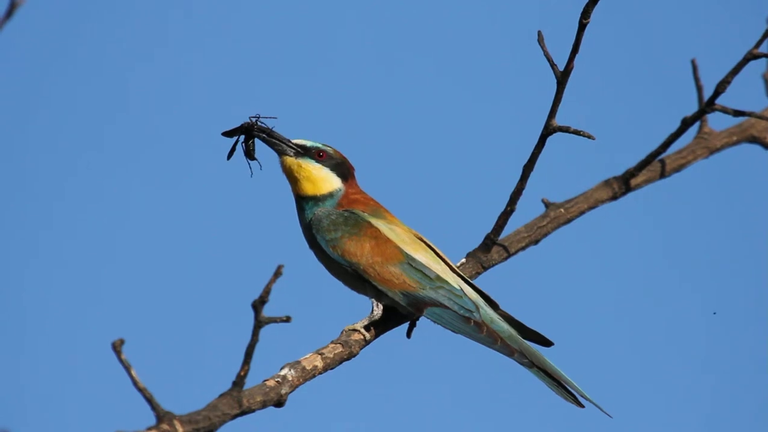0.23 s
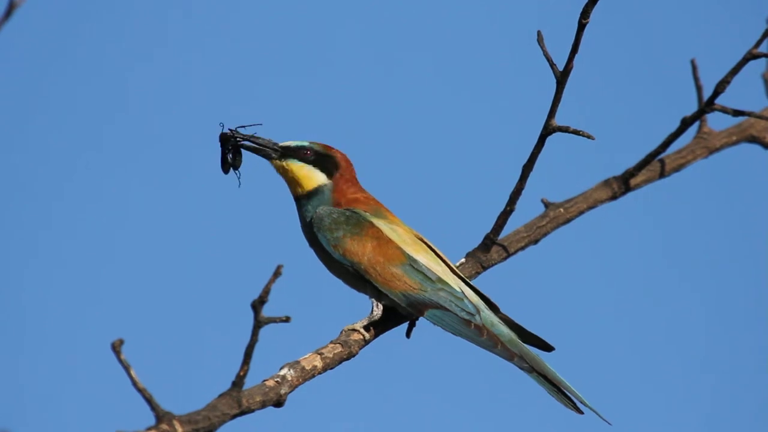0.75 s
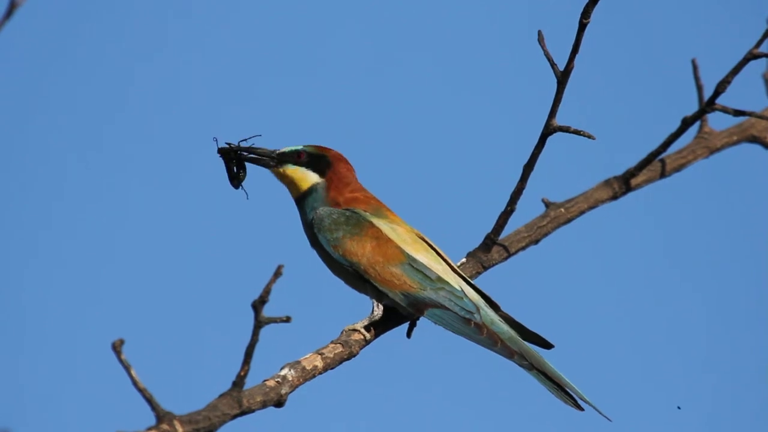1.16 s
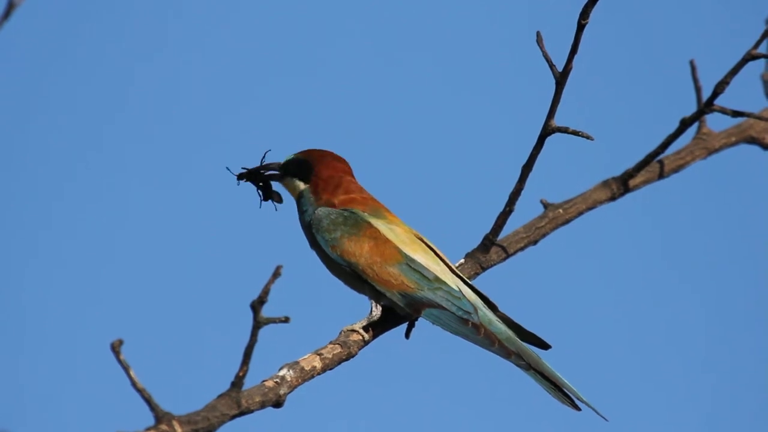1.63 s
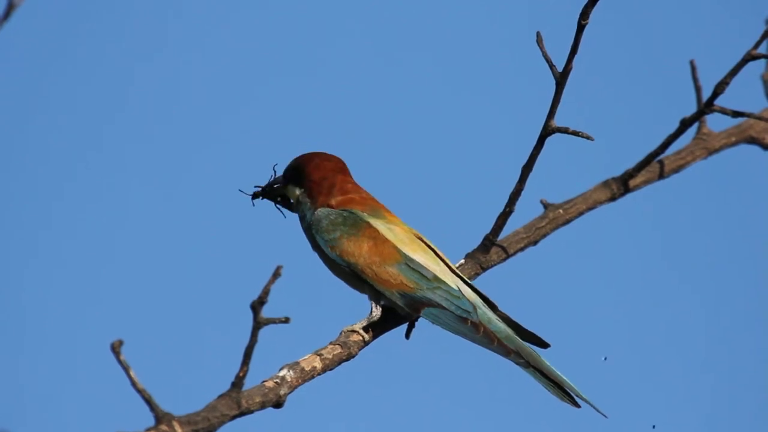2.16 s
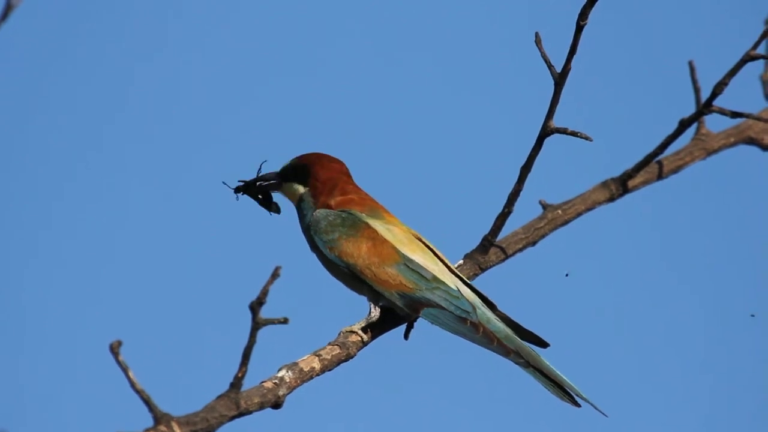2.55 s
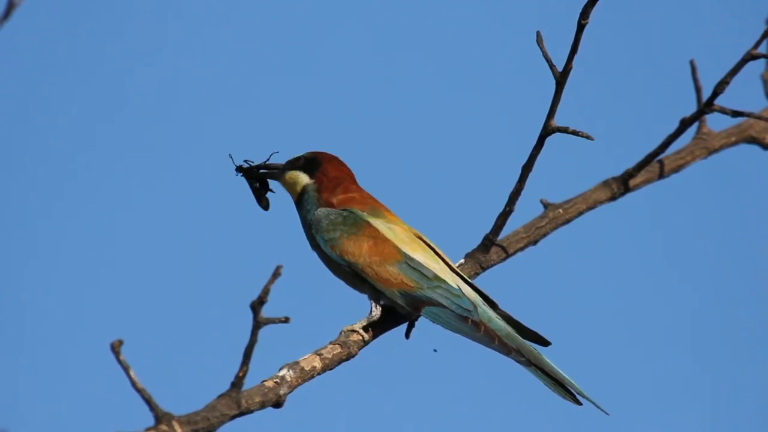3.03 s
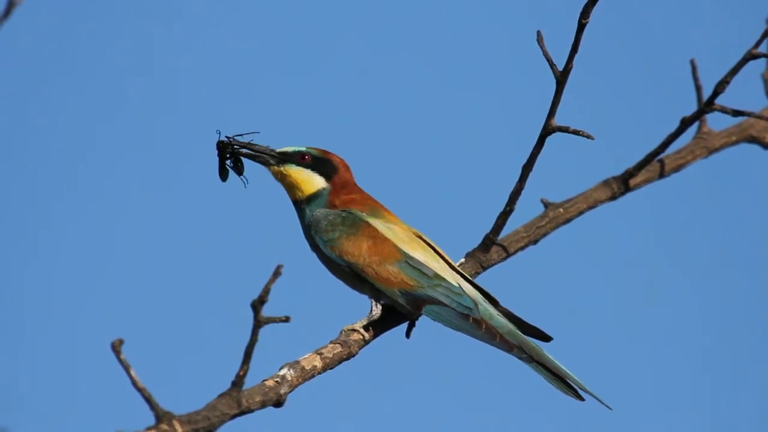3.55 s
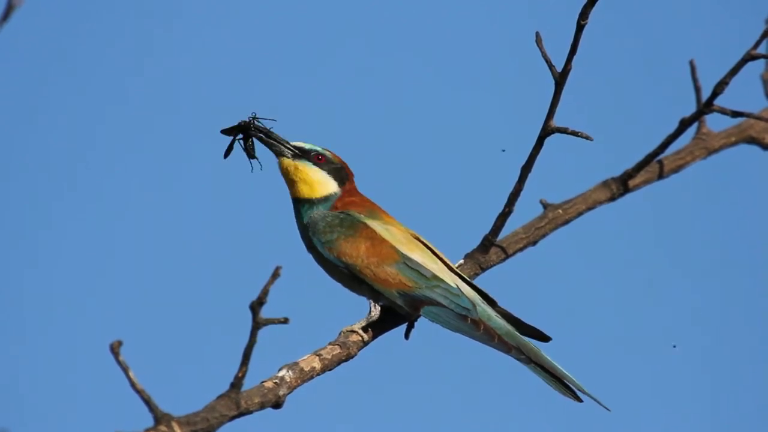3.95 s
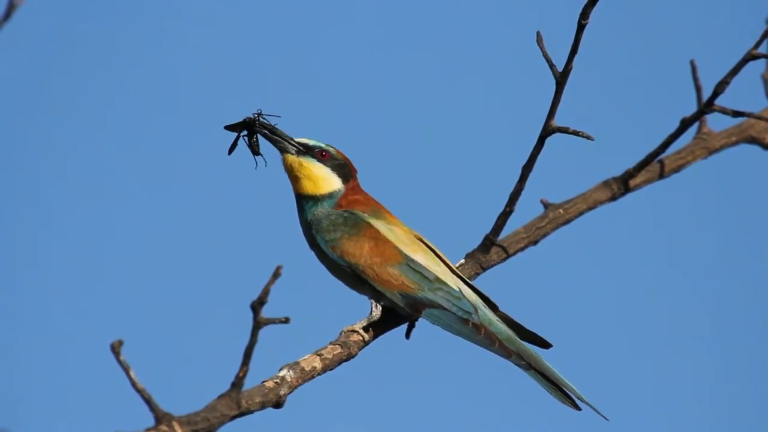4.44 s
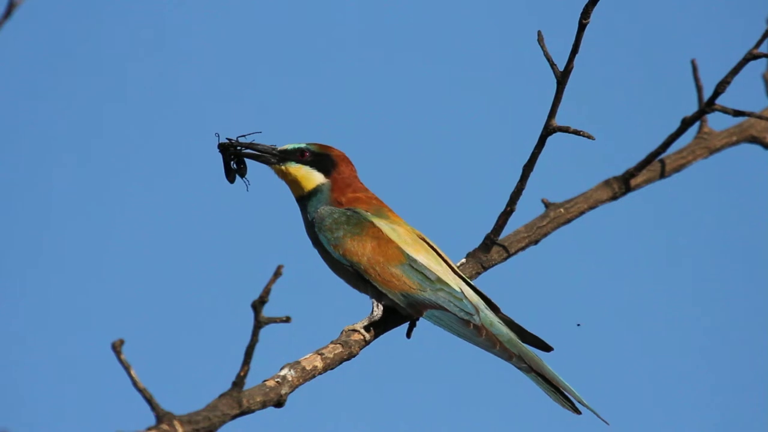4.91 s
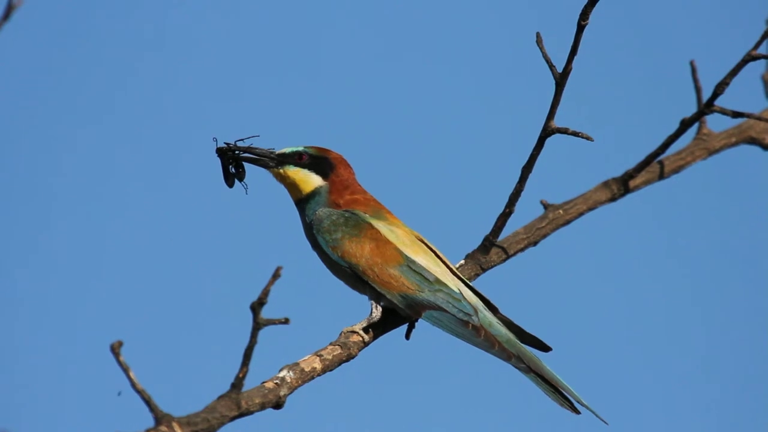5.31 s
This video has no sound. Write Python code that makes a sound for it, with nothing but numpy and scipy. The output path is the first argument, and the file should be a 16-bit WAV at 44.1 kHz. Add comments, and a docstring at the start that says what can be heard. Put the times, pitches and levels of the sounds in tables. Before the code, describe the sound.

A calm open landscape, about 5.6 seconds. A loud, burry bee-eater whistle is already under way at the start. Very high, thin songbird notes slip by at 0.1-0.5 s, the first rising, the second mostly falling, over faint low hums in the first second or so. Softer chips follow around 0.3, 0.6 and 0.9 s, then strong rolling whistles near 1.1, 1.2, 1.8 and 2.1 s, and a pair overlapping around 2.6 s. Each lasts roughly a tenth of a second or less, sweeping near 2 kHz. Calls then thin out: chips at 3.0 and 3.4, a higher, sharper one at 3.5, a roll at 4.65, another sharp chip at 5.2, and a last loud call at 5.5 s. Throughout, a faint flock whistles irregularly, and distant toads give soft, sagging hoots from 0.6 s onward. Insects shimmer quietly over hush; low breeze swells softly at the start, 1.25 and 3.1 s. Trees return diffuse tails.

```python
"""Open country on a calm day, bee-eaters calling around a perch, the loud ones near and the faint ones farther off.
Each call is a short, nearly pure whistle that arches or rolls in pitch; the single calls each have a ground echo
that beats against them and makes them burr. Branches and far trees scatter the calls as filtered noise tails.
Farther off, more of the flock whistle at random and toads hoot in sagging tones, with two faint low hums.
A small songbird gives two thin, high notes; insects chirr in throbbing noise bands, over a soft rush of air."""
import sys
import numpy as np
from scipy import signal
from scipy.fft import rfft, irfft
from scipy.io import wavfile
from scipy.ndimage import map_coordinates

SR = 44100
rng = np.random.default_rng(int(sys.argv[2]) if len(sys.argv) > 2 else 0)


def dump(signal):
    """Clip the signal to [-1, 1] and save it as 16-bit WAV at the path in sys.argv[1]."""
    limited = np.clip(np.atleast_2d(signal).T, -1, 1)
    pcm = np.round(limited * 32767).astype(np.int16)
    wavfile.write(sys.argv[1], SR, pcm)


N = 246078
TIME = np.arange(N) / SR   # seconds

# Individual long calls, loud ones near and faint ones farther off; one arch of pitch, up to three even flicks:
# crest_s, rise_ms, fall_ms, start_hz, crest_hz, end_hz, flick_spacing_ms, flick_before_crest_hz,
# flick_on_crest_hz, flick_after_crest_hz, swell_db, octave_db, level_db, ground_echo_delay_ms, ground_echo_db
LONG_CALLS = [(-0.0082, 45.0, 33.0, 1600.0, 2042.0, 1166.0, 24.0, 2, 3, 0, 24.0, -35, -16.5, 5.1, -16),
              (0.1935, 107.0, 60.0, 1953.0, 2009.0, 1710.0, 25.0, -2, 616.0, 174.0, 5.0, -42, -45.6, 6.08, -4),
              (0.5246, 105.0, 48.0, 2011.0, 1952.0, 1733.0, 45.0, 465.0, 1030.0, 0, 2.0, -42, -43.5, 6.47, -4.8),
              (1.0797, 50.0, 48.0, 1661.0, 2031.0, 1487.0, 26.0, 283.0, 575.0, 184.0, 15.0, -42, -22.1, 9.74, -17),
              (1.2295, 42.0, 23.0, 1537.0, 1971.0, 1400.0, 24.0, -1, 4, 0, 23.0, -42, -16.2, 1.86, -2.2),
              (1.4964, 56.0, 43.0, 1800.0, 2191.0, 1657.0, 19.0, 285.0, 412.0, 377.0, 4.0, -42, -41.5, 5.9, -6.4),
              (1.8007, 42.0, 21.0, 1491.0, 1977.0, 1553.0, 20.0, 0, 286.0, 0, 21.0, -42, -22, 11.2, -14),
              (1.9451, 106.0, 63.0, 1914.0, 2002.0, 1861.0, 34.0, 458.0, 442.0, 492.0, 0, -42, -41.5, 6.2, -5.0),
              (2.1339, 49.0, 44.0, 1630.0, 2077.0, 1605.0, 24.0, 478.0, 607.0, 174.0, 13.0, -42, -19, 9.43, -15.0),
              (2.618, 50.0, 10.0, 1701.0, 2024.0, 1812.0, 37.0, 0, 396.0, 0, 16.0, -42, -18.5, 7.1, -14),
              (2.649, 42.0, 21.0, 1532.0, 1965.0, 1400.0, 24.0, 0, 0, 0, 24.0, -42, -16.0, 1.85, -1.5),
              (4.6492, 49.0, 59.0, 1532.0, 1979.0, 1330, 24.0, 328.0, 373.0, 374.0, 14.0, -26.5, -24, 6.4, -10),
              (5.4797, 27.0, 9.0, 1400.0, 2117.0, 2024.0, 24.0, 0, 469.0, 0, 20.0, -42, -21.5, 8.26, -14.0)]
# Individual short calls, loud ones near and faint ones farther off; a soft grace note, then a peaked main note:
# peak_s, time_stretch, pitch_hz, upward_flick_hz, level_db, ground_echo_delay_ms, ground_echo_db
SHORT_CALLS = [(0.3316, 1.17, 2000, 174, -30.5, 6.8, -5.3), (0.6076, 1.02, 2038, 155, -28, 7, -6),
               (0.674, 1.1, 2045, 230, -40.5, 8.8, -6.3), (0.8806, 1.04, 2043, 200, -28.5, 6.8, -6.1),
               (0.998, 0.97, 1985, 320, -39.6, 7.7, -8), (1.3977, 1.08, 1965, 100, -29.1, 9.9, -5.3),
               (1.7709, 1.02, 1967, 200, -31, 6.75, -5), (2.075, 1.2, 2027, 227, -39.5, 7.3, -8),
               (2.5465, 0.94, 2120, 97, -40, 8.5, -11), (2.8428, 1.22, 2020, 138, -45, 8.42, -7.0),
               (2.99, 1.15, 1975, 164, -31.5, 7.1, -9), (3.2401, 0.98, 2050, 134, -40.5, 8.24, -3.4),
               (3.3593, 1.0, 2005, 146, -29, 7.26, -8), (3.5464, 0.75, 2354, 253, -21.3, 7.9, -16),
               (4.2882, 1.14, 1976, 204, -29.1, 7.22, -7), (5.0835, 1.22, 1999, 214, -42.5, 8.09, -8),
               (5.2189, 0.7, 2383, 249, -23, 5.61, -13), (5.3857, 1.16, 1936, 170, -31, 7.25, -8)]
# Whistle overtones: multiple_of_pitch, level_relative_to_octave_db
OVERTONES = [(2, 0), (3, -10.5), (6, -18)]
# A broad faint hiss around 3.6 kHz, part of the background air, then two higher bands of insects:
# centre_hz, width_hz, level_db, throbs_per_s, throb_depth_0_to_1
HISS_AND_INSECTS = [(3600, 510, -65, 2.6, 0.23), (5295, 220, -65.5, 4.6, 0.41),
                    (5680, 450, -66.5, 3.2, 0.08)]
# Colour of the air and far landscape: frequency_hz, relative_level_db_per_hz
AIR_COLOUR = [(15, -45), (25, -15), (66, -1.5), (140, -5.5), (359, -5.5), (421, -5), (509, -4), (631, -7),
              (996, -8), (1750, -3), (2170, -5), (4490, -15), (5430, -18.5), (6380, -21.5), (15500, -30.5)]
# Low rush of the breeze: time_s, level_db
BREEZE_LEVEL = [(0, -53.5), (0.35, -53.5), (0.7, -63), (1.25, -56), (1.7, -65.5), (2.7, -70), (3.1, -56),
                (3.5, -66), (5.58, -62.5)]
# Faint low hums: centre_s, length_s, pitch_hz, level_db
LOW_HUMS = [(0.281, 0.65, 374.3, -55.5), (0.979, 0.503, 215.3, -56.5)]
# A small songbird's two thin notes, the first sliding up, the second mostly down: time_s, pitch_hz, level_db
SONGBIRD_GLIDES = [(0.07, 6300, -78), (0.12, 6550, -64), (0.17, 6850, -80), (0.22, 7050, -73),
                   (0.33, 6900, -92), (0.375, 6550, -71), (0.402, 6170, -58), (0.425, 5900, -68),
                   (0.46, 6080, -63), (0.49, 6100, -82)]
# Far toads: centre_s, level_db
TOAD_HOOTS = [(0.59, -58), (1.54, -55), (1.82, -58), (2.14, -59.5), (2.45, -63), (2.97, -55.5),
              (3.31, -57.5), (3.57, -54), (3.92, -53), (4.38, -56), (4.72, -59.5), (4.94, -55), (5.36, -55)]

# The tone blooms as it passes the throat resonance, and thins out above the top pitch
THROAT_HZ, THROAT_WIDTH_HZ, THROAT_DB = 2225, 100, 1.5
TOP_HZ, TOP_LOSS_DB_PER_HZ = 2463, .019
# Long calls: power law of the arch; flick width as a share of the spacing; attack and release
ARCH_CURVE, FLICK_WIDTH, ROLL_EDGE_MS = 2.6, .27, 3.4
# Short calls, before the time stretch: climb to the peak and fall from it; flick width; two notes
CHIP_SLOPE_HZ_PER_MS, CHIP_FLICK_MS = 15.2, 5.6
GRACE_MS, GRACE_DB, GRACE_ATTACK_MS, GRACE_RELEASE_MS = 18.5, -9.5, 7.3, 7.1
NOTE_LEAD_MS, NOTE_TAIL_MS, NOTE_ATTACK_MS, NOTE_RELEASE_MS = 13.3, 20.6, 3.9, 12.3
AIR_DB = -48
CUTOFF_HZ = 15700


def from_db(db):
    """Decibels to gain."""
    return 10 ** (np.asarray(db) / 20)


def rms_one(x):
    """Scale to unit power."""
    return x / np.sqrt(np.mean(x ** 2) + 1e-20)


def add(out, start_s, sound):
    """Mix a sound in at a time, dropping what falls outside."""
    at = int(round(start_s * SR)) + np.arange(len(sound))
    inside = (at >= 0) & (at < N)
    out[at[inside]] += sound[inside]


def band_noise(low_hz, high_hz):
    """Noise in one band, unit power."""
    band = signal.butter(2, [low_hz, high_hz], "band", fs=SR, output="sos")
    return rms_one(signal.sosfilt(band, rng.standard_normal(N)))


def waver(length, per_s):
    """Random wander along straight lines between normal draws, per_s draws each second."""
    knots = np.arange(length) * per_s / SR
    return map_coordinates(rng.standard_normal(length // 8 + 4), [knots], order=1, mode="wrap")


def gate(ms, start, end, attack, release):
    """Straight attack, hold and release."""
    return np.clip(np.minimum((ms - start) / attack, (end - ms) / release), 0, 1)


def bump(x, centre, width):
    """A bell curve of height 1."""
    return np.exp(-((x - centre) / width) ** 2)


def whistle(hz, envelope, octave_db=-38.0, jitter=.007, shimmer_db=1.0, overtone_flicker_db=4.5):
    """The syrinx follows a glide with slight tremor and weak, unsteady overtones; the throat colours it."""
    hz = hz * (1 + jitter * waver(len(hz), 500))
    bloom_db = THROAT_DB * bump(hz, THROAT_HZ, THROAT_WIDTH_HZ)
    throat_db = bloom_db - TOP_LOSS_DB_PER_HZ * np.maximum(hz - TOP_HZ, 0)
    phase = 2 * np.pi * np.cumsum(hz) / SR
    overtones = sum(from_db(db) * np.sin(round(multiple) * phase) for multiple, db in OVERTONES)
    overtone_gain = from_db(octave_db + overtone_flicker_db * waver(len(hz), 250))
    tone = np.sin(phase) + overtone_gain * overtones
    return tone * envelope * from_db(throat_db + shimmer_db * waver(len(hz), 400))


def roll(rise_ms, fall_ms, start_hz, crest_hz, end_hz, spacing_ms,
         before_hz, on_hz, after_hz, swell_db, octave_db):
    """Pitch and level swell to a crest and sink, with flicks on top. Gives (start s from the crest, sound)."""
    ms = np.arange(-rise_ms, fall_ms, 1000 / SR)
    slack = np.maximum(-ms / rise_ms, ms / fall_ms)   # 0 at the crest, 1 at both ends
    outer_hz = np.where(ms < 0, start_hz, end_hz)
    arch = crest_hz + (outer_hz - crest_hz) * slack ** ARCH_CURVE
    flicks = sum(hz * bump(ms / spacing_ms, place, FLICK_WIDTH)
                 for place, hz in ((-1, before_hz), (0, on_hz), (1, after_hz)))
    swell = from_db(-swell_db * slack ** 2)
    envelope = swell * gate(ms, -rise_ms, fall_ms, ROLL_EDGE_MS, ROLL_EDGE_MS)
    return -rise_ms / 1000, whistle(arch + flicks, envelope, octave_db)


def chip(stretch, pitch_hz, flick_hz):
    """A short call climbs, breaks off briefly, flicks over its peak, falls. Gives (start s from peak, sound)."""
    first_ms = -NOTE_LEAD_MS - GRACE_MS
    ms = np.arange(first_ms, NOTE_TAIL_MS, 1000 / SR / stretch)   # unstretched time
    hz = pitch_hz - CHIP_SLOPE_HZ_PER_MS * np.abs(ms) + flick_hz * bump(ms, 0, CHIP_FLICK_MS)
    grace = from_db(GRACE_DB) * gate(ms, first_ms, -NOTE_LEAD_MS, GRACE_ATTACK_MS, GRACE_RELEASE_MS)
    note = gate(ms, -NOTE_LEAD_MS, NOTE_TAIL_MS, NOTE_ATTACK_MS, NOTE_RELEASE_MS)
    return first_ms * stretch / 1000, whistle(hz, grace + note)


def individual_birds(close_db=-19.5, wetness=0.31):
    """Direct calls, and what they send into the trees: fainter birds are farther off, hence more diffuse."""
    direct, send = np.zeros(N), np.zeros(N)
    for voice, table in ((chip, SHORT_CALLS), (roll, LONG_CALLS)):
        for time_s, *gesture, level_db, echo_ms, echo_db in table:
            lead_s, call = voice(*gesture)
            start_s = time_s + lead_s
            add(direct, start_s, from_db(level_db) * call)
            # the late ground echo has another pitch than the gliding direct sound, so the two beat
            add(direct, start_s + echo_ms / 1000, from_db(level_db + echo_db) * call)
            send_db = level_db + wetness * (close_db - level_db)
            add(send, start_s, from_db(send_db) * call)
    return direct, send


def far_flock(count=110, level_db=-54.5, spread_db=2.3, pitch_hz=2020, pitch_spread=.06,
              flick_hz=380, ends=.82):
    """Distant birds give chips and rolls in turn, with random timing, pitch, flicks and level."""
    out = np.zeros(N)
    chances = rng.random((count, 4))
    variations = rng.standard_normal((count, 2))
    for k, ((when, *flicks), (pitch, size)) in enumerate(zip(chances, variations)):
        hz = pitch_hz * (1 + pitch_spread * pitch)
        before, on, after = flick_hz * np.array(flicks)
        if k % 2:
            _, call = chip(1, hz, on)
        else:
            _, call = roll(rise_ms=55, fall_ms=45.6, start_hz=ends * hz, crest_hz=hz, end_hz=ends * hz,
                           spacing_ms=24.06, before_hz=before, on_hz=on, after_hz=after,
                           swell_db=10, octave_db=-41)
        start_s = (k + when) / count * N / SR
        add(out, start_s, from_db(level_db + spread_db * size) * call)
    return out


def hiss_and_insects():
    """Unevenly throbbing noise bands: a broad faint hiss of background air, and two higher bands of insects."""
    out = np.zeros(N)
    for hz, width_hz, level_db, per_s, depth in HISS_AND_INSECTS:
        cycle = np.cumsum(per_s * (1 + 0.26 * waver(N, 3.03))) / SR
        throb = 1 + depth * np.sin(2 * np.pi * cycle)
        out += from_db(level_db) * band_noise(hz - width_hz / 2, hz + width_hz / 2) * throb
    return out


def air():
    """A steady wide hush of coloured noise, and a low noise rush that comes with the breeze."""
    hz, level_db = np.transpose(AIR_COLOUR)
    bins_hz = np.maximum(np.fft.rfftfreq(N, 1 / SR), 1)
    colour = from_db(np.interp(np.log(bins_hz), np.log(hz), level_db))
    hush = rms_one(irfft(rfft(rng.standard_normal(N)) * colour, N))
    rush = band_noise(56, 470) * from_db(np.interp(TIME, *np.transpose(BREEZE_LEVEL)))
    return from_db(AIR_DB) * hush + rush


def scatter(x, delay_s, t60, low_hz):
    """Countless small reflections arrive late and die away; twigs and leaves return high notes best."""
    t = np.arange(SR) / SR
    tail = rng.standard_normal(SR) * from_db(-60 * t / t60) * (t > delay_s)
    bright = signal.sosfilt(signal.butter(4, low_hz, "high", fs=SR, output="sos"), x)
    return signal.fftconvolve(bright, tail / np.sqrt(np.sum(tail ** 2)))[:N]


def hoot(length_s, hz, sag, wobble=0.022, flutter_db=4.0):
    """A soft swelling tone whose pitch sags towards both ends; the long path makes it unsteady."""
    u = np.linspace(-1, 1, int(length_s * SR))   # 0 at the middle
    glide = hz * (1 - sag * u ** 2 + wobble * waver(len(u), 49.3))
    swell = np.cos(np.pi * u / 2) * from_db(flutter_db * waver(len(u), 36.2))
    return np.sin(2 * np.pi * np.cumsum(glide) / SR) * swell


def low_tones(hoot_s=.18, hoot_hz=528):
    """Toads hoot from a far pond as sagging tones; two faint hums that sag less lie below them."""
    out = np.zeros(N)
    for centre_s, level_db in TOAD_HOOTS:
        hz = hoot_hz * (1 + rng.normal(0, 0.0145))
        add(out, centre_s - hoot_s / 2, from_db(level_db) * hoot(hoot_s, hz, sag=0.18))
    for centre_s, length_s, hz, level_db in LOW_HUMS:
        add(out, centre_s - length_s / 2, from_db(level_db) * hoot(length_s, hz, sag=0.018))
    return out


def songbird():
    """Two thin, high notes of a trembling sine: the first slides up, the second mostly down."""
    time_s, hz, level_db = np.transpose(SONGBIRD_GLIDES)
    glide = np.interp(TIME, time_s, hz) * (1 + .006 * waver(N, 150))
    phase = 2 * np.pi * np.cumsum(glide) / SR
    sounding = (TIME > time_s[0]) & (TIME < time_s[-1])
    # the level sinks almost to nothing between the notes
    return np.sin(phase) * from_db(np.interp(TIME, time_s, level_db)) * sounding


def scene():
    """Calls scatter from nearby branches and, more faintly, from far trees and slopes."""
    birds, send = individual_birds()
    flock = far_flock()
    branches = from_db(-16.0) * scatter(send + flock, delay_s=0.0092, t60=0.18, low_hz=2100)
    far_trees = from_db(-21.5) * scatter(send + flock, delay_s=0.048, t60=1.0, low_hz=2080)
    calls = birds + flock + branches + far_trees
    return (calls + low_tones() + songbird() + hiss_and_insects() + air())[None]


def record(dry):
    """The sound at the microphone opens over 1 ms, and the top is cut steeply."""
    opening = np.minimum(TIME / .001, 1)
    top_cut = signal.ellip(12, .1, 80, CUTOFF_HZ, fs=SR, output="sos")
    return signal.sosfilt(top_cut, dry * opening)


dry = scene()
out = record(dry)
dump(out)
```